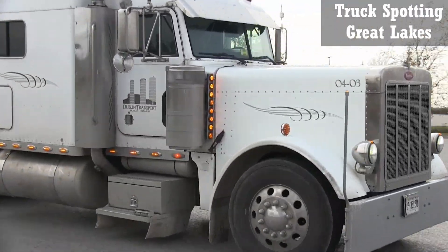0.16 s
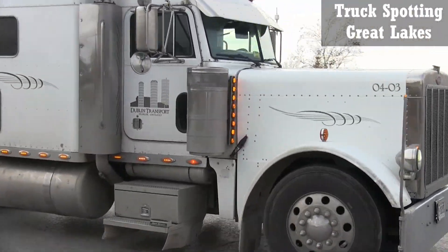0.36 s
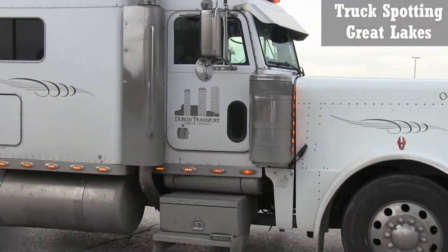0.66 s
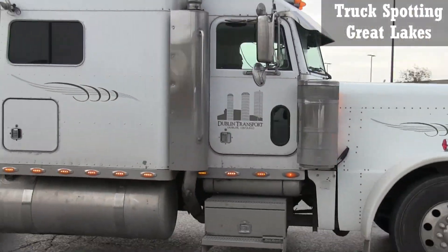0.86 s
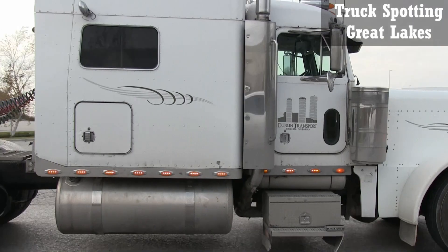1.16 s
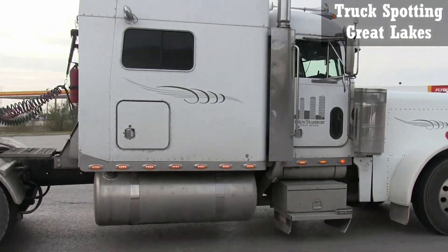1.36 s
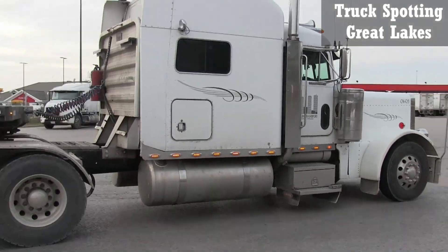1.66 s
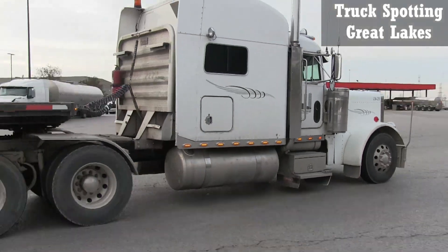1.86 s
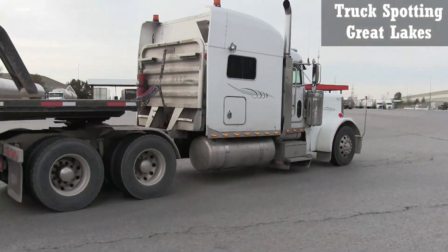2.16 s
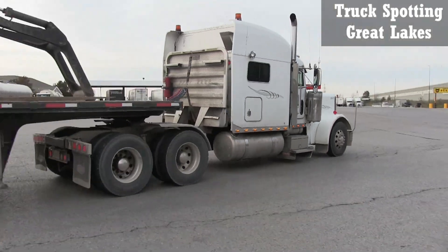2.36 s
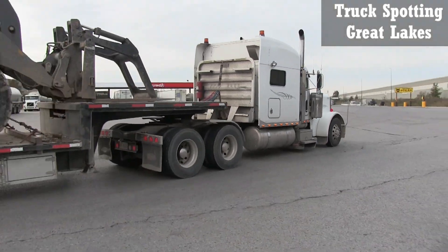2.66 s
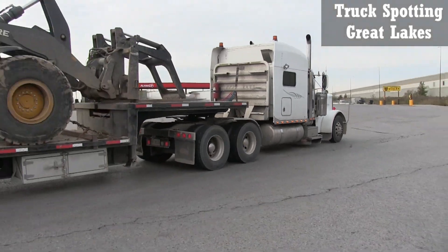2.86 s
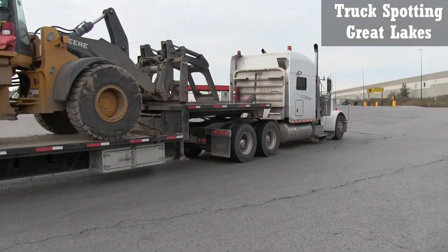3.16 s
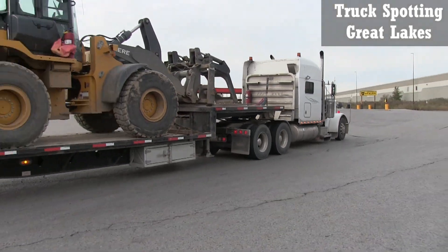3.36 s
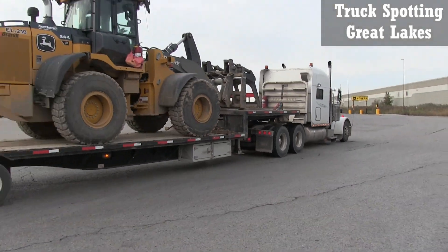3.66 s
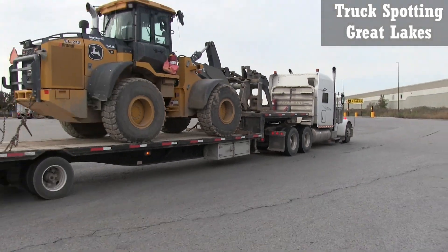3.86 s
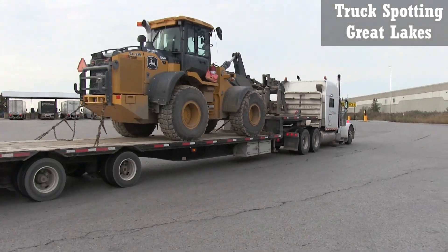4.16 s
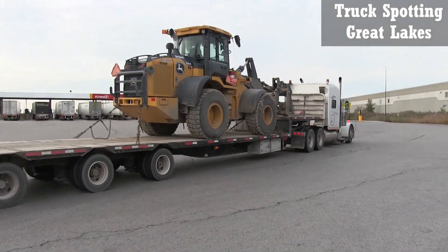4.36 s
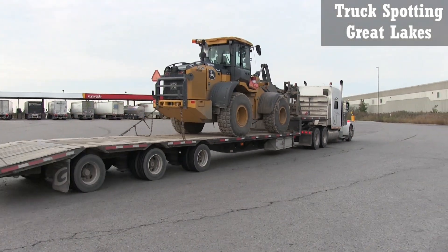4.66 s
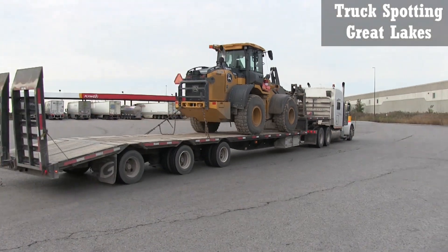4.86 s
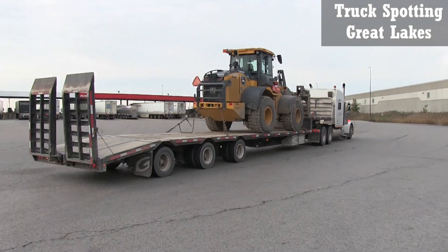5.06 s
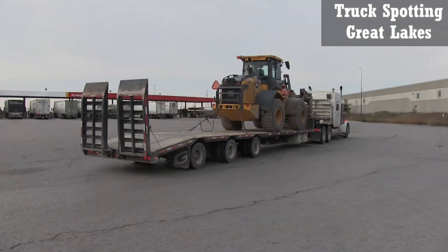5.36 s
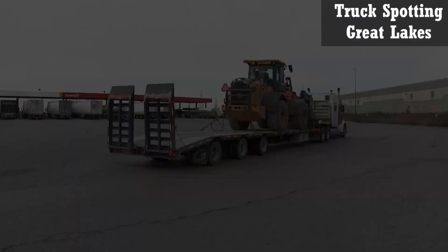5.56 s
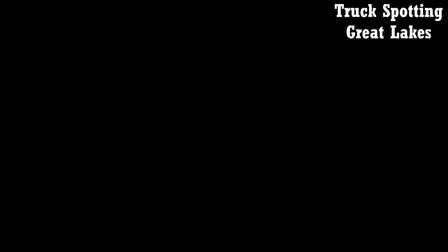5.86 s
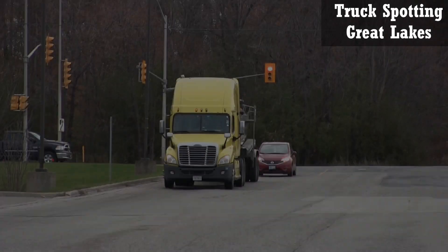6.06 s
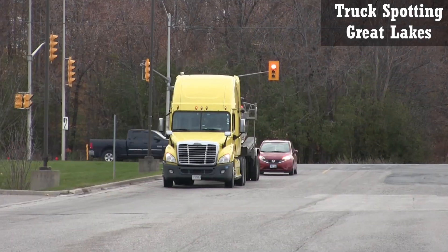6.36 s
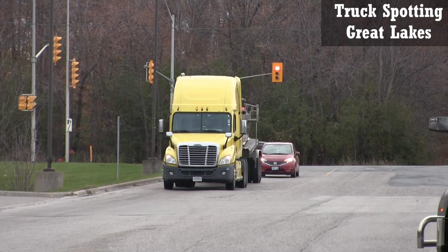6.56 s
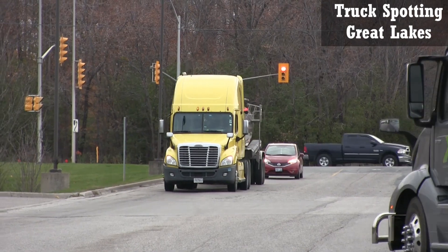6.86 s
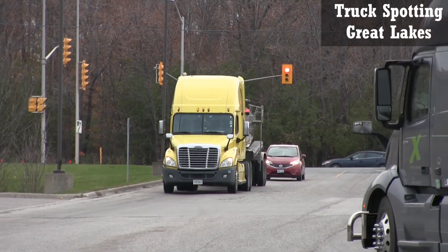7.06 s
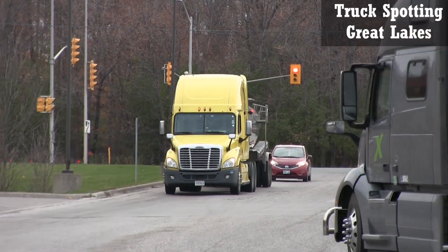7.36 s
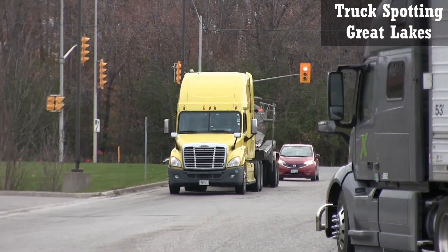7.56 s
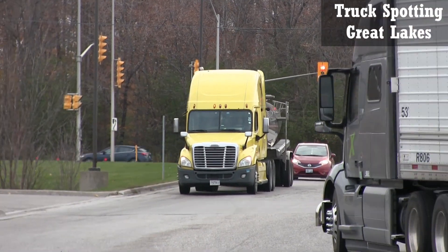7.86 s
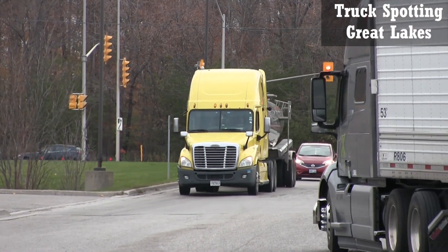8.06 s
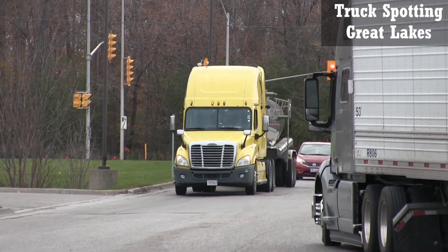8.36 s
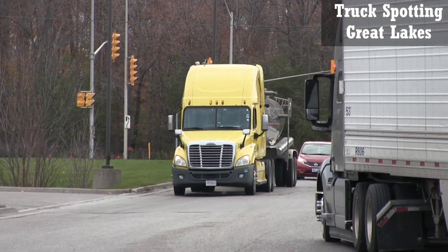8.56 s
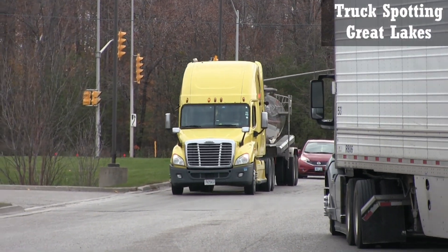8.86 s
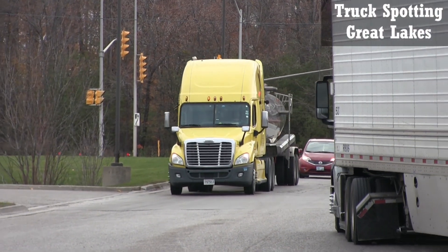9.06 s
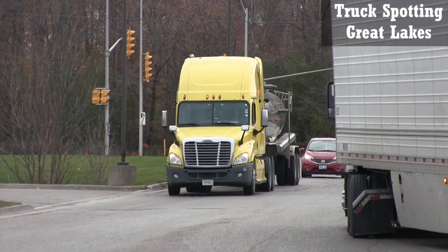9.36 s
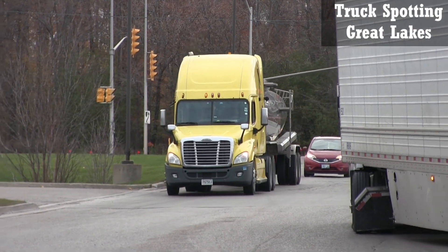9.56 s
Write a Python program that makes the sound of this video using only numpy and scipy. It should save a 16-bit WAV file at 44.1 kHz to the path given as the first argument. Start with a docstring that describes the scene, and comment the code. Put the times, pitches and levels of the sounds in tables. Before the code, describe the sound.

A big diesel crawls past very near, dense and steady, with whining gears and a double steel clank. It grows duller with distance as wind puffs rumble and a rapid metallic idle clatter rises. After a fade to a road junction comes a click, a gust and one second of complete silence. Then hollow engine thumping, fuzzy road noise, a falling engine note and growing hiss.

```python
"""A loaded diesel truck crawls past close by and draws away over a wide paved lot: coloured noise throbbing
with its firings, exhaust tones, gear whines, steel clanks, then the ringing clatter of a second, idling diesel.
The sound fades over to a road junction with a hum, fuzzy bands of noise, idling thumps and a slowing truck.
Wind puffs on the microphones as lumpy low noise. The sound drops out for one second and returns."""
import sys
import numpy as np
from scipy import signal
from scipy.fft import rfft, irfft
from scipy.io import wavfile
from scipy.ndimage import uniform_filter1d, minimum_filter1d

SR = 44100
rng = np.random.default_rng(int(sys.argv[2]) if len(sys.argv) > 2 else 0)


def pcm_store(signal):
    """Save signal as 16-bit PCM."""
    levels = np.round(np.clip(np.atleast_2d(signal), -1, 1) * 32767)
    wavfile.write(sys.argv[1], SR, levels.astype(np.int16).T)


N = 428211
T = np.arange(N) / SR  # time of each sample (s)
SILENCE_START_S, SILENCE_END_S = 6.4022, 7.4023

# bands of noise that stand out at the junction: f/Hz, width/Hz
JUNCTION_BANDS = [(820, 170.), (1600, 400.), (3200, 451), (4280, 280.)]
# how loud they are: t/s, then level/dB of each band
JUNCTION_BAND_LEVELS = [(5.3, -70, -68, -92, -90), (5.8, -35, -47, -66, -67), (6.3, -29.5, -46.5, -57, -59),
                        (7.402, -23, -26.5, -49, -51), (7.5, -25.5, -29, -48, -50),
                        (7.75, -26, -32, -46, -49), (8, -25, -37, -48, -54), (8.3, -27, -30, -49, -51),
                        (8.45, -35, -38, -56, -54), (8.801, -33, -31, -59, -64), (9.2, -31, -31, -55, -59),
                        (9.7, -33, -44, -58, -62)]


def gain_of(db):
    """Turn decibels into a factor on the waveform."""
    return 10 ** (np.asarray(db) / 20)


def evened(x):
    """Scale a sound to an rms of 1."""
    return x / np.sqrt(np.mean(x ** 2) + 1e-20)


def read(points, hz):
    """Value of a spectrum at hz, on a log axis."""
    f, value = np.transpose(points)
    return np.interp(np.log(hz + 1), np.log(f + 1), value)


def play(rows, t):
    """Every column of a curve table at the points t of its first column."""
    s, *columns = np.transpose(rows)
    return np.array([np.interp(t, s, c) for c in columns])


def bumps(rows):
    """Sum of bell-shaped rises in dB from rows t/s, half width/s, rise/dB."""
    return sum(db * np.exp(-((T - s) / width) ** 2) for s, width, db in rows)


def drift(width, count):
    """Smooth random curves of overall rms 1, averaged twice over width samples."""
    once = uniform_filter1d(rng.standard_normal((count, N)), int(width))
    return evened(uniform_filter1d(once, int(width)))


def whistle(hz, width):
    """A narrow band of noise that follows the curve hz: slow chance carried up to that pitch."""
    slow = signal.lfilter(*signal.butter(2, width / SR), rng.standard_normal((2, N)))
    turn = 2 * np.pi * np.cumsum(hz * np.ones(N)) / SR
    return evened(slow[0] * np.cos(turn) + slow[1] * np.sin(turn))


def add(mix, s, sound):
    """Mix in a short sound starting at s seconds, cut off at the end."""
    part = mix[round(s * SR):][:len(sound)]
    part += sound[:len(part)]


def placed(x, pan_db):
    """Make a sound stereo, with the left louder than the right by pan_db."""
    return x * gain_of([[pan_db / 2], [-pan_db / 2]])


def shares(t):
    """Weights of near, far and junction at the times t, blending from one place to the next."""
    # where we listen: t/s, place (0 near, 1 far, 2 junction)
    place = [(1., 0.15), (4., 1.31), (5.4, 0.92), (6., 1.896)]
    return np.clip(1 - abs(play(place, t)[0] - np.arange(3)[:, None]), 0, 1)


def firings(turns):
    """Each firing is a quick puff that dies away before the next."""
    # strength of each firing in the engine cycle: level/dB
    cylinders_db = [2., -2., 1., -1., 3., -3.]
    strength = gain_of(np.take(cylinders_db, turns.astype(int) % len(cylinders_db)))
    return uniform_filter1d(strength * np.exp(-(turns % 1) / .35), size=90)


def roar(puff):
    """Rumble, block and hiss: noise of a changing colour, each throbbing with the firings."""
    # noise colour with the truck near, far over the lot, and at the junction: f/Hz, level/dB per Hz
    near = [(30, -43), (60, -27.5), (100, -19.5), (130, -13.5), (250, -6.5), (400, -14.5), (620, -26.5),
            (800, -22.5), (1220, -22.5), (1600, -21), (1880, -24.5), (2320, -34), (3000, -34.5),
            (3650, -37.5), (3850, -43), (5200, -45.5), (5900, -51), (6300, -49.5), (7500, -67.5),
            (8500, -89.5), (11000, -130)]
    far = [(30, -40), (60, -22), (100, -10), (130, -6), (300, -7), (490, -14), (725, -23.5), (900, -25.5),
           (1220, -25), (1800, -32), (2200, -36.5), (2600, -42), (3250, -45), (3650, -54.5), (5200, -54.5),
           (6500, -62), (7500, -69.5), (8500, -81.5), (11000, -130)]
    at_junction = [(30, -39), (60, -22), (100, -8), (200, -3.5), (330, -5.5), (470, -12.5), (620, -18),
                   (1000, -14.5), (1800, -23), (2050, -32), (2500, -32.5), (2850, -38), (3100, -37),
                   (3900, -44.5), (4600, -46.5), (4900, -47), (5300, -49.5), (7000, -56.5), (8500, -66),
                   (15000, -79.5)]
    # left-right likeness: f/Hz, near, far, junction (1 = the same)
    likeness = [(60, 0.93, 1, 0.81), (150, 0.98, 0.95, 0.97), (340, 1, 0.98, 1), (520, .88, 0.91, 0.9),
                (692, 0.92, 0.58, 0.54), (850, 0.83, 0.55, 1), (1280, 0.89, 0.67, 0.37),
                (1600, 0.93, 0.54, 0.82), (2060, 0.67, 0.19, 0.55), (2600, 0.8, 0.23, 0.56),
                (3900, 0.84, 0.22, 0.48), (6000, 0.45, 0.39, .48), (8000, 0.34, .3, 0.93)]
    # left over right: f/Hz, difference/dB
    left_right = [(40, 3.5), (100, -0.5), (340, -0.3), (520, -0.2), (700, -2.5), (1100, -5), (1720, -0.6),
                  (2600, -2.5), (3100, -3.5), (4700, -5), (6000, -5), (8000, 0)]
    # borders between rumble, block and hiss: f/Hz
    band_edges = [600, 2000]
    # shared loudness before the mix: t/s, level/dB
    roar_level = [(0, -17.5), (.5, -17), (1.2, -16.5), (1.6, -17), (2.3, -16.5), (2.9, -16.5), (3.5, -17),
                  (4.1, -18), (4.8, -17.5), (5.3, -18), (5.6, -20.5), (6.05, -23), (6.3, -21), (6.4, -21),
                  (7.5, -20.5), (8.3, -19.5), (9., -19), (9.7, -18)]
    # added for near, far and junction, one row each: rumble/dB, block/dB, hiss/dB
    mix_db = [(1.5, 0, -12), (1.9, -3, -14.5), (2.4, -2.5, -16.5)]
    # depth of the throb in rumble, block and hiss, before the factor below
    throb_depths = (.06, .07, .07)
    # the throb fades with distance: t/s, factor
    closeness = [(0, 2.), (.8, 1.8), (1.5, 1.2), (2.2, .8), (5.5, .4), (6.3, 0)]
    # change in the hiss: t/s, level/dB
    hiss_level = [(0, 1), (.6, 0), (1.1, -2), (2., -1.5), (2.7, 1), (3.9, -2), (4.8, 0.5), (5.5, -0.5),
                  (6.3, 2.5), (7.4, 1.5), (8., 1), (9.7, -1)]
    # brief surges of the hiss: t/s, half width/s, rise/dB
    spits = [(.13, .03, 2), (.515, .018, 3.5), (.7, 0.027, 1), (1.36, .04, 2.5)]
    # hiss above top_hz, growing as a trailer rolls by: t/s, level/dB
    top_level = [(6.4, 0.5), (7.4, -0.5), (8.3, 0), (9., 5.5), (9.7, 9)]
    top_hz = 7540

    # the noise is drawn as a grid of frequencies and short time frames
    frames, hz = N // 512 + 5, np.fft.rfftfreq(2048, 1 / SR)
    frame_s = np.arange(frames) * 512 / SR
    a, b, c, d, patches = rng.standard_normal((frames, 1025, 5)).T
    patches = evened(uniform_filter1d(uniform_filter1d(patches, 14, 0), 5, 1))
    share = shares(frame_s)
    colour_db = np.array([read(p, hz) for p in (near, far, at_junction)]).T @ share
    colour_db = colour_db + np.outer(hz > top_hz, play(top_level, frame_s)[0])

    # the right side is a blend of the left noise and a noise of its own
    same = np.clip(play(likeness, hz).T @ share, -1, 1)
    left = a + 1j * b
    right = same * left + np.sqrt(1 - same ** 2) * (c + 1j * d)
    noise = np.array([left, right]) * gain_of(1.1 * patches)
    noise *= gain_of(read(left_right, hz) / 2 * [[1], [-1]])[:, :, None]

    above = [1 / (1 + (edge / (hz + 1)) ** 8) for edge in band_edges]  # power cross-overs
    bands = np.array([1 - above[0], above[0] - above[1], above[1]]).clip(0)
    beat = play(closeness, T)[0] * evened(puff - puff.mean())
    levels_db = play(roar_level, T) + np.transpose(mix_db) @ shares(T)
    levels_db[2] += play(hiss_level, T)[0] + bumps(spits)
    out = np.zeros((2, N))
    for band, db, throb in zip(bands, levels_db, throb_depths):
        shape = gain_of(colour_db) * np.sqrt(band)[:, None]
        shape = shape / np.linalg.norm(shape, axis=0)
        x = signal.istft(noise * shape, nperseg=2048, noverlap=1536)[1][:, :N]
        out += gain_of(db) * evened(x * (1 + throb * beat))
    return out


def knock(puff):
    """Diesel knock: a thin metallic ring, a narrow noise band gated by each firing."""
    # t/s, level/dB
    knock_level = [(0, -47), (.12, -42), (.3, -50.5), (.42, -41.5), (.6, -42), (.8, -44), (.9, -53.5),
                   (1.5, -56.5), (2., -70)]
    ring = evened(puff * whistle(3620, 260))  # centre and width in Hz
    return placed(gain_of(play(knock_level, T)[0]) * ring, -3.5)


def exhaust(turns, levels_db):
    """Low multiples of the firing rate, wavering more the higher they lie, until the silence."""
    # multiples of the firing rate
    orders = [3, 4, 5, 7, 9]
    wobble = drift(2500, count=2 * len(orders)).reshape(2, -1, N) * np.c_[orders]
    phase = 2 * np.pi * np.outer(orders, turns) + .017 * wobble[0]
    tones = gain_of(levels_db + .17 * wobble[1]) * np.sin(phase)
    return np.sqrt(2) * tones.sum(0) * (T < SILENCE_START_S)


def whines(firing_hz):
    """Fuzzy gear-mesh whistles tied to engine speed, stronger on the right."""
    # multiple of the firing rate, width/Hz
    gears = [(26.75, 11.), (40.9, 36.), (27.6, 130.)]
    # t/s, then level/dB of each whine before panning
    whine_levels = [(0, -36, -37, -22.5), (.15, -35, -33, -30), (.32, -29, -29.5, -27),
                    (.55, -37.5, -35.5, -28), (.8, -29, -34.5, -33), (1.2, -35, -29.5, -35.5),
                    (1.5, -33, -43, -30.5), (1.8, -29, -36.5, -29), (2.1, -32, -35, -30),
                    (2.3, -28, -29.5, -30), (2.55, -30, -33, -28), (2.75, -29, -33, -23.5),
                    (3., -35, -37, -31), (3.16, -33, -29.5, -28), (3.45, -40, -47, -38.5),
                    (3.65, -32, -50, -38), (3.95, -32, -51, -37.5), (4.3, -42, -50, -40),
                    (5.2, -71.5, -69, -68.5)]
    out = np.zeros((2, N))
    for (order, width), db, pan_db in zip(gears, play(whine_levels, T), (-4., -9., -4.)):
        out += placed(gain_of(db) * whistle(order * firing_hz, width), pan_db)
    return out


def hum():
    """A low hum of steady pitch, as from an idling engine: a sine and its octave."""
    # t/s, level/dB of the hum, level/dB of its octave
    hum_levels = [(0, -37.5, -43), (3.8, -46, -39), (5.6, -46.5, -33), (6.3, -39, -28.5), (7.5, -37.5, -32),
                  (8.1, -43, -41), (8.75, -34, -48), (9.05, -35, -25.5), (9.3, -41, -40), (9.6, -38, -27)]
    tones = np.sin(2 * np.pi * 45.1 * np.outer([1, 2], T))
    return np.sqrt(2) * (gain_of(play(hum_levels, T)) * tones).sum(0)


def wind():
    """Lumpy low noise, unrelated at the two microphones; the lumps partly arrive together."""
    # colour: f/Hz, level/dB per Hz
    wind_colour = [(20, -22), (45, -10), (70, -5), (130, 0), (200, -3), (330, -8), (500, -20), (900, -40),
                   (3000, -90)]
    # wind between gusts: t/s, level/dB
    breeze = [(0, -59), (.6, -36), (1., -43.5), (2., -45), (2.8, -27.5), (4., -26.5), (4.4, -44.5),
              (5., -25), (5.6, -28), (6.2, -45), (7.45, -31), (8., -41), (8.6, -26), (9.2, -35.5),
              (9.7, -33)]
    # t/s, half width/s, rise over the breeze/dB
    gusts = [(.7, .07, 10), (1.2, .07, 13), (1.7, 0.09, 7), (2.19, 0.079, 20), (2.4, 0.047, 11),
             (2.7, 0.29, 6.5), (3., 0.037, 9), (3.3, 0.093, 4), (3.5, .07, 1), (3.7, 0.046, 3),
             (4.1, 0.13, 7.5), (4.65, 0.19, 9), (4.9, 0.07, 5), (6.4, 0.084, 18), (7.65, 0.072, 6),
             (8.55, 0.027, 19.5), (8.75, 0.068, 9), (9.15, 0.17, 11)]
    hz = np.fft.rfftfreq(N, 1 / SR)
    air = irfft(rfft(rng.standard_normal((2, N))) * gain_of(read(wind_colour, hz)), N)
    both, *each = drift(460, count=3)
    lumps = gain_of(3.3 * both + 2.5 * np.array(each))
    return gain_of(play(breeze, T)[0] + bumps(gusts)) * evened(air * lumps)


def clanks():
    """Scrapes of noise, knocks (a low steel ring), ticks, and squeaks that flutter as the steel slips."""
    # rasp of steel on steel: t/s, level/dB, time to fall 60 dB/s
    scrapes = [(1.563, -31, .17), (1.7575, -30, .025), (1.777, -39, .08)]
    # knocks on the trailer: t/s, level/dB, time to fall 60 dB/s
    knocks = [(1.5625, -5, .05), (1.7575, -1.5, .036), (1.779, -15, .09)]
    # tones in a knock: f/Hz, level/dB
    steel = [(1220, -2), (1570, -4), (1860, -7)]
    # small bright ticks: t/s, level/dB
    ticks = [(5.7105, -42), (5.856, -49)]
    # steel squeaks: t/s, length/s, start f/Hz, end f/Hz, level/dB
    squeaks = [(1.564, .032, 4330, 4450, -35.5), (1.592, .034, 4520, 4620, -42),
               (1.564, .05, 2170, 2250, -29), (1.66, .03, 4850, 4930, -46), (1.776, .018, 4400, 4320, -37)]
    out, t = np.zeros(N), T[:3000]
    middle = signal.butter(3, [2200 / SR * 2, 6800 / SR * 2], "band", output="sos")
    falling = signal.butter(2, 2600 / SR * 2)  # takes treble off the rasp

    for (s, db, t60), noise in zip(scrapes, rng.standard_normal((len(scrapes), len(t)))):
        rasp = evened(signal.lfilter(*falling, signal.sosfilt(middle, noise)))
        # a bright snap opens each scrape
        snap = evened(signal.sosfilt(middle, noise[::-1])) * gain_of(-11 - 60 * t / .03)
        scrape = rasp * gain_of(-60 * t / t60) + snap
        add(out, s, scrape * gain_of(db) * np.minimum(t / .001, 1))

    for s, db, t60 in knocks:
        ring = sum(gain_of(mode_db) * np.sin(2 * np.pi * hz * t) for hz, mode_db in steel)
        onset = np.sin(np.pi / 2 * np.minimum(t / .0022, 1)) ** 2
        add(out, s, ring * gain_of(db - 60 * t / t60) * onset)

    for (s, db), noise in zip(ticks, rng.standard_normal((len(ticks), len(t)))):
        tick = np.sin(2 * np.pi * 5200 * t) + .8 * evened(signal.sosfilt(middle, noise))
        add(out, s, tick * gain_of(db - 60 * t / .07) * np.minimum(t / .001, 1))

    for s, length, start_hz, end_hz, db in squeaks:
        u = T[:round(length * SR)]
        flutter = 1 + .5 * np.cos(2 * np.pi * 170. * u + 2. * np.sin(2 * np.pi * 47. * u))
        tone = np.sin(2 * np.pi * (start_hz * u + (end_hz - start_hz) * u ** 2 / (2 * length)))
        fade = gain_of(db - 3.9 * u / length) * signal.windows.tukey(len(u), .2)
        add(out, s, fade * flutter * tone)
    return signal.sosfilt(signal.butter(10, 7400 / SR * 2, output="sos"), out)


def clatter():
    """A second, idling diesel: metallic rings and clicks at each firing, over a pulsing narrow noise."""
    # clatter rings at set times, loud and faint: t/s, level/dB, f/Hz
    timed_rings = [(4.2333, -27, 2340), (4.2921, -27, 2510), (4.3228, -22, 2280), (4.385, -26, 2450),
                   (4.4166, -25, 2330), (4.4769, -25, 2390), (4.5064, -20, 2410), (4.5677, -26, 2420),
                   (4.6795, -20, 2300), (4.7062, -25, 2130), (4.7274, -25, 2370), (4.7693, -24.5, 2250),
                   (4.796, -26, 2130), (4.8226, -28, 2350), (4.8516, -23, 2260), (4.9197, -25, 2120),
                   (4.9454, -20, 2290), (4.9713, -22, 2530), (5.0362, -15.5, 2271), (5.062, -20, 2540),
                   (5.0923, -20, 2090), (5.121, -23, 2340), (5.1499, -21, 2330), (5.2113, -15, 2250),
                   (5.2405, -27, 2250), (5.2669, -25, 2620), (5.2981, -16, 2350), (5.3275, -20, 2490),
                   (5.3529, -30, 2420), (5.3789, -21, 2370), (5.4437, -22.5, 2440), (5.4737, -19, 2360),
                   (5.528, -20, 2390), (5.554, -19, 2356), (5.5879, -31, 2350), (5.6188, -23, 2400),
                   (5.6423, -15, 2330), (5.6802, -20, 2320), (5.769, -22, 2450), (5.7964, -26, 2350),
                   (5.8224, -25, 2440), (5.8573, -19, 2290), (5.9132, -20.5, 2370), (5.9965, -30, 2420),
                   (6.0808, -27.5, 2290)]
    # base loudness of the clatter: t/s, level/dB
    clatter_level = [(3.6, -59), (4., -42), (4.5, -41), (5., -40), (5.6, -39), (5.95, -44), (6.2, -46),
                     (6.4, -80)]
    fir_per_s, strong_fir_s = 34.1, 5.298  # firing pace, and one strong firing
    out, t = np.zeros(N), T[:2000]
    fir = np.arange(-57, 30)
    fir_s = strong_fir_s + fir / fir_per_s
    chance, pitch = rng.standard_normal((len(fir), 2)).T
    base_db = play(clatter_level, fir_s)[0]

    # broad click at each firing
    click_band = signal.butter(2, [1800 / SR * 2, 3700 / SR * 2], "band", output="sos")
    clicks = signal.sosfilt(click_band, rng.standard_normal((len(fir), len(t))))
    for s, db, click in zip(fir_s, base_db + 4. + 2. * pitch, clicks):
        add(out, s - .003, evened(click) * gain_of(db - 60 * t / .05) * np.minimum(t / .002, 1))

    # a ring at each firing, uneven, every third one stronger
    firing_db = base_db + 8.5 + 6 * (fir % 3 == 0) + 6 * chance
    firing_rings = zip(fir_s, firing_db, 2360 + 120 * pitch)
    for s, db, hz in [*timed_rings, *firing_rings]:
        overtone = gain_of(-12) * np.sin(2 * np.pi * 1.13 * hz * t)  # second mode of the ring
        soft_start = 1 - np.exp(-t / 0.0016)
        add(out, s, gain_of(db - 60 * t / 0.035) * soft_start * (np.sin(2 * np.pi * hz * t) + overtone))

    pulses = np.cos(2 * np.pi * fir_per_s * (T - strong_fir_s - .006))
    pulsing_db = play(clatter_level, T)[0] + 2.2 * pulses + 2. * drift(600, count=1)[0]
    out = out + gain_of(pulsing_db) * whistle(2400., 400.)
    return signal.sosfilt(signal.butter(8, 4500 / SR * 2, output="sos"), out)  # dulled by distance


def junction_noise():
    """Fuzzy bands of road and turbine noise, each a narrow band of steady pitch."""
    out = np.zeros(N)
    for (f, width), db in zip(JUNCTION_BANDS, play(JUNCTION_BAND_LEVELS, T)):
        out += gain_of(db) * whistle(f, width)
    return out


def thumps():
    """An idling engine: short hollow bursts in the lowest band, one a firing, gliding up a little."""
    idle_per_s, strong_beat_s = 28.8, 7.885  # firing pace, and one strong beat
    out, beat = np.zeros(N), np.arange(-60, 17)
    u = T[:1200] - T[600]  # time from the middle of a burst
    beat_s = strong_beat_s + beat / idle_per_s
    chance = rng.standard_normal((len(beat), 3))
    # louder than the band, every third stronger still, all a little uneven
    levels_db = play(JUNCTION_BAND_LEVELS, beat_s)[0] + 8.5 + 5.5 * (beat % 3 == 0) + 2. * chance[:, 0]
    for s, db, (_, late, pitch) in zip(beat_s, levels_db, chance):
        hz = JUNCTION_BANDS[0][0] * (1 + .04 * pitch + 6. * u)
        burst = np.exp(-(u / .0055) ** 2) * np.sin(2 * np.pi * hz * u + pitch)
        add(out, s - T[600] + .0015 * late, gain_of(db) * burst)
    return out


def slowing_truck():
    """The falling engine tone of a truck slowing at the junction, heard after the silence starts."""
    # t/s, f/Hz, level/dB
    slowing = [(7.4, 219.4, -28), (8., 206.3, -31), (8.6, 194, -33.5), (9.2, 181.6, -27), (9.7, 176, -42)]
    hz, db = play(slowing, T)
    return gain_of(db) * whistle(hz, 7.3) * (T > SILENCE_START_S)


def scene():
    """Run the passing truck's engine, pan the vehicle sounds, and add wind, clanks and clatter."""
    # exhaust of the passing truck: t/s, firing rate f/Hz, then rms level/dB of each exhaust tone
    exhaust_curve = [(0, 45.05, -38, -27, -25, -30, -32), (.25, 45.15, -28, -28, -30, -21.5, -36),
                     (.5, 45.2, -22, -26, -23, -19, -40), (.7, 45.2, -20, -26, -21, -17, -35),
                     (.9, 45.2, -22, -23, -19.5, -16, -31), (1.1, 45.2, -23, -24, -20, -20, -25),
                     (1.3, 45.15, -19.5, -29, -20.5, -26, -21.5), (1.5, 45.1, -21, -31, -27, -25, -32),
                     (1.7, 45.05, -20, -34, -32, -34, -25), (1.9, 45., -21, -32, -20, -36, -27),
                     (2.1, 44.9, -18.5, -35, -17.5, -29, -25.5), (2.35, 44.75, -20, -35, -22, -30, -27),
                     (2.6, 44.6, -22, -33, -27, -33, -36), (2.95, 44.4, -31, -33, -26, -35, -42),
                     (3.3, 44.35, -22, -31, -26, -42, -34), (3.85, 44.3, -20, -42, -31, -36, -33),
                     (4.35, 44.1, -24, -36, -28, -44, -45), (4.75, 43.9, -21.5, -33, -38, -38, -46),
                     (5.3, 43.7, -22.5, -35, -38, -40, -46), (5.75, 43.6, -26, -44, -38, -44, -46),
                     (6.1, 43.5, -38, -44, -40, -48, -50)]
    # left over right: t/s, difference/dB
    pan = [(0, 0.5), (1, 0), (2.5, 0.5), (3.2, 1), (4.3, 1), (5.2, 2), (6.4, 1), (7.4, 0.1), (8.5, 0.5),
           (9.7, 1.5)]
    firing_hz, *orders_db = play(exhaust_curve, T)
    turns = np.cumsum(firing_hz) / SR  # firings so far
    puff = firings(turns)
    trucks = roar(puff) + knock(puff) + exhaust(turns, np.array(orders_db)) + whines(firing_hz)
    trucks = trucks + hum() + junction_noise() + thumps() + slowing_truck()
    trucks = trucks * gain_of(play(pan, T) / 2 * [[1], [-1]])
    return trucks + wind() + placed(clanks(), -6.5) + placed(clatter(), 3.)


def record(dry):
    """Thin the deepest bass, limit peaks, add a click and the silent second, then cut the top treble."""
    # brief swells of the whole sound around the silence: t/s, half width/s, rise/dB
    surges = [(6.358, 0.031, 6.5), (7.43, 0.023, 2.5)]
    click_s = 6.3356
    x = signal.lfilter(*signal.butter(2, 36. / SR * 2, "high"), dry)
    x = x * gain_of(bumps(surges))
    # quick limiter: turn down around peaks above full scale
    x = x * uniform_filter1d(minimum_filter1d(1 / np.maximum(abs(x), 1), size=145), size=97)
    x = x + gain_of(-20) * (T > click_s) * np.exp(-abs(T - click_s) / .0004)
    x = x * ((T < SILENCE_START_S) | (T > SILENCE_END_S))
    treble_cut = signal.firwin(255, 15500, window=("kaiser", 9), fs=SR)
    return signal.oaconvolve(x, treble_cut[None], "same")


dry = scene()
out = record(dry)
pcm_store(out)
```